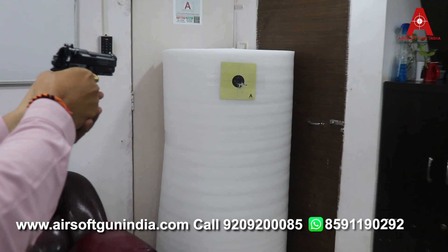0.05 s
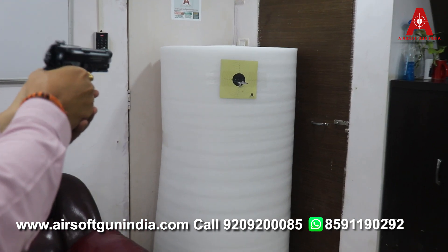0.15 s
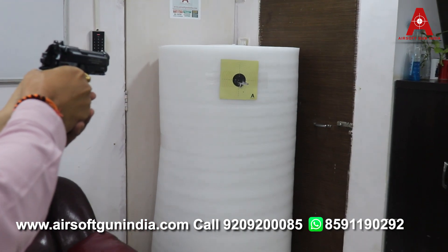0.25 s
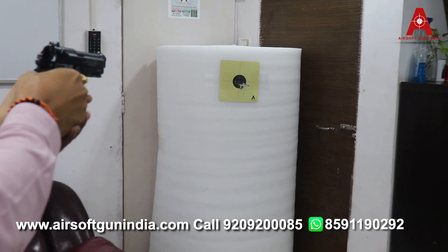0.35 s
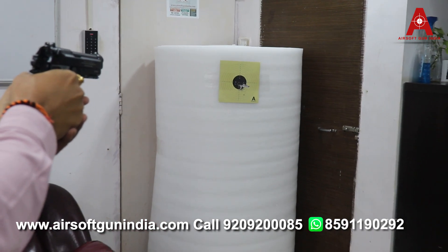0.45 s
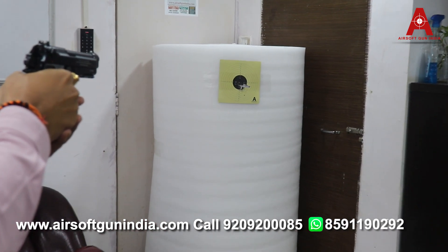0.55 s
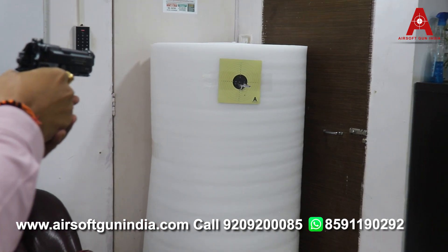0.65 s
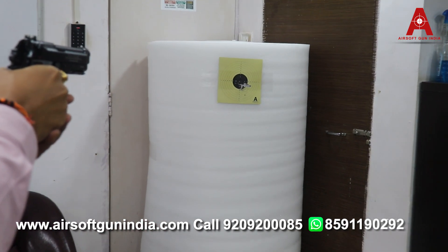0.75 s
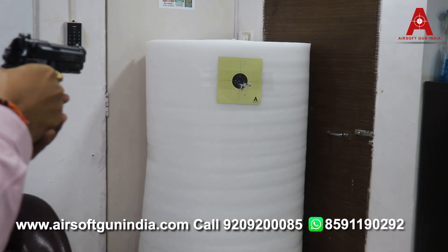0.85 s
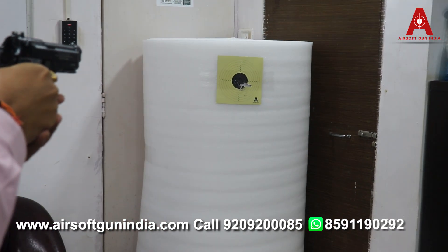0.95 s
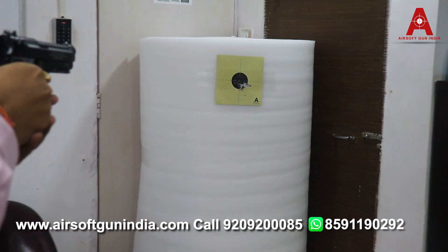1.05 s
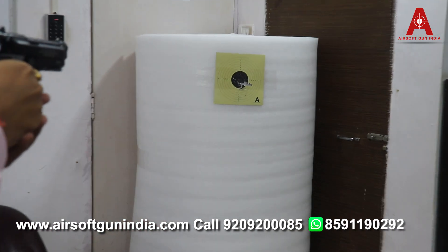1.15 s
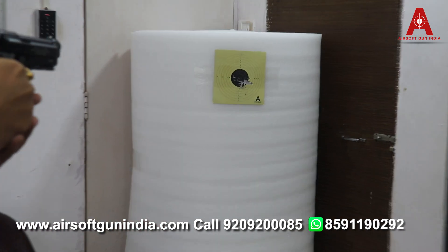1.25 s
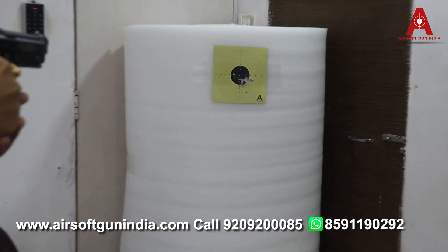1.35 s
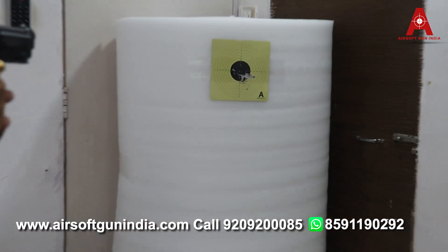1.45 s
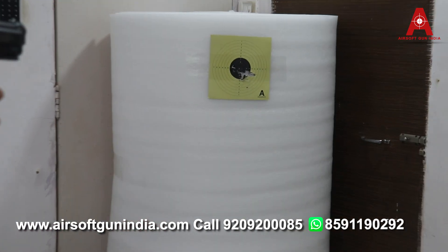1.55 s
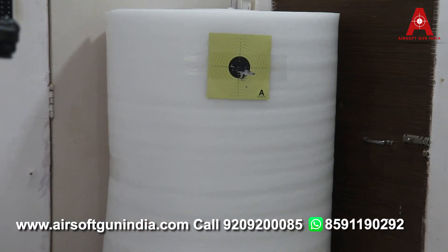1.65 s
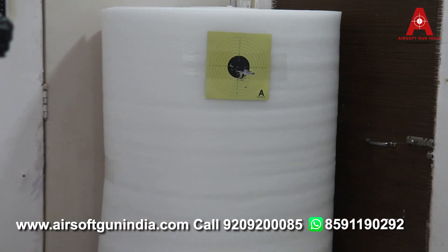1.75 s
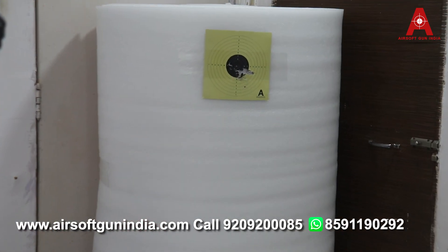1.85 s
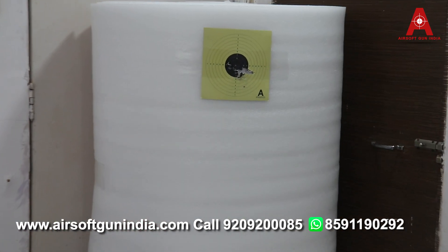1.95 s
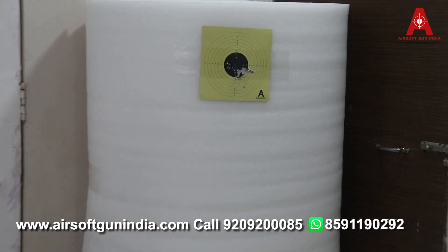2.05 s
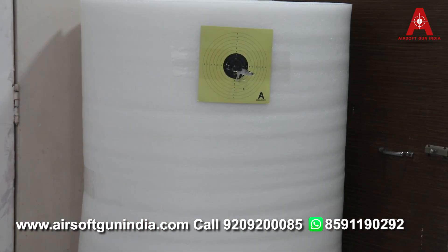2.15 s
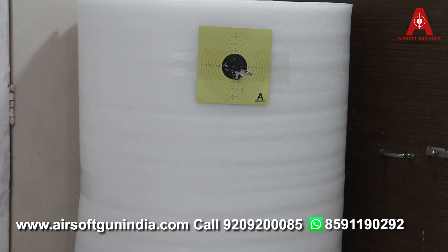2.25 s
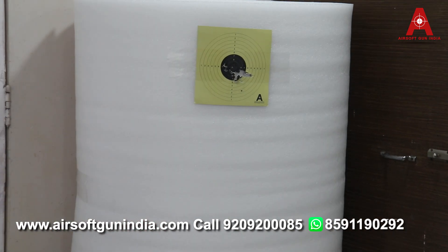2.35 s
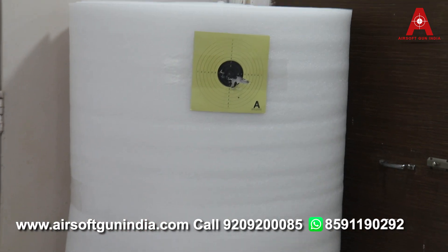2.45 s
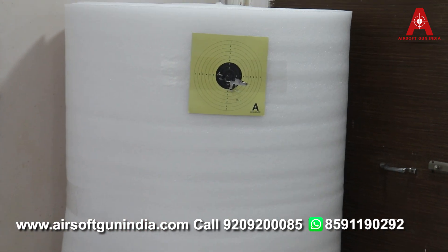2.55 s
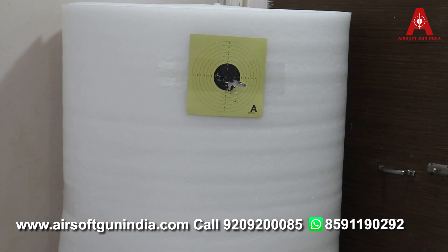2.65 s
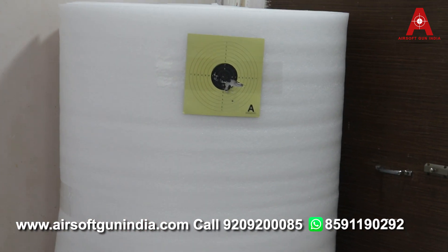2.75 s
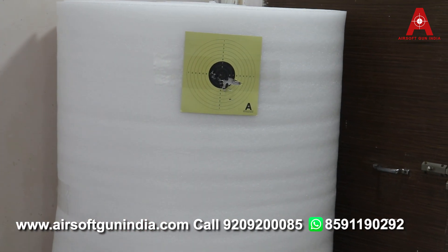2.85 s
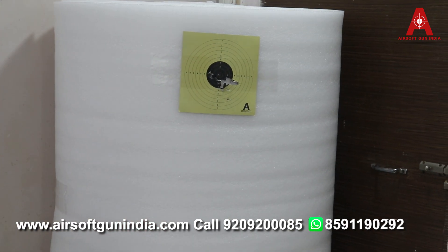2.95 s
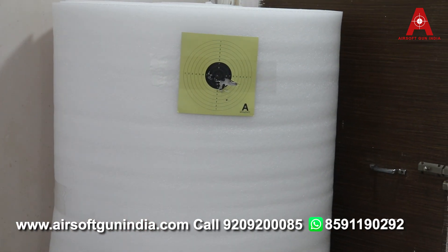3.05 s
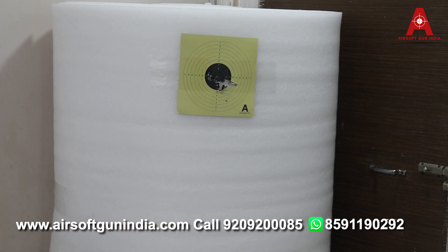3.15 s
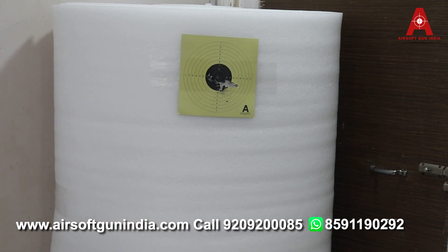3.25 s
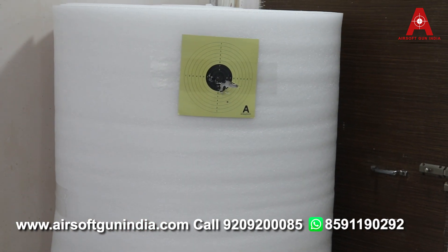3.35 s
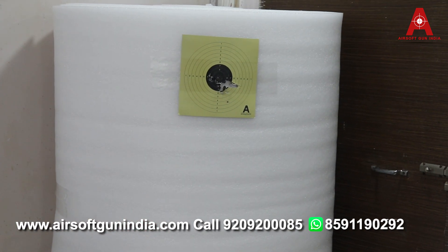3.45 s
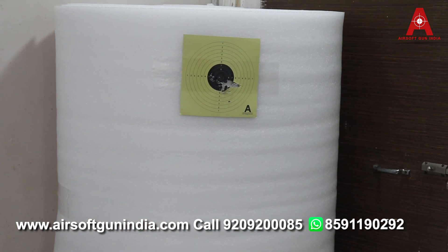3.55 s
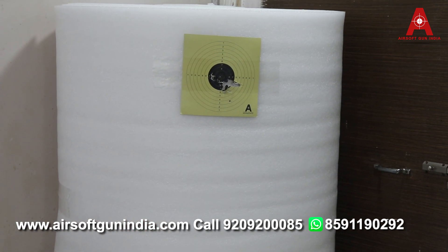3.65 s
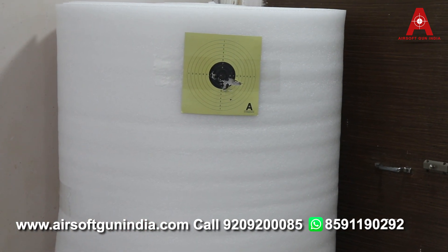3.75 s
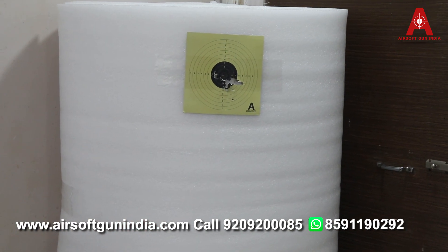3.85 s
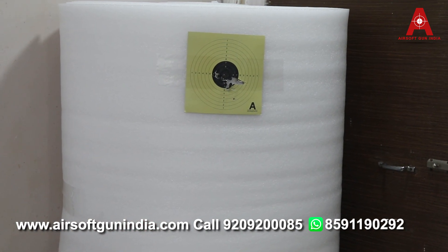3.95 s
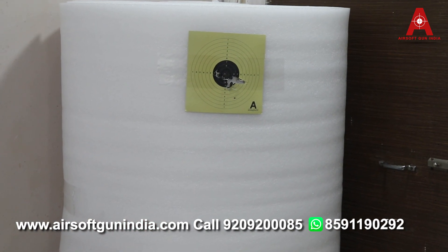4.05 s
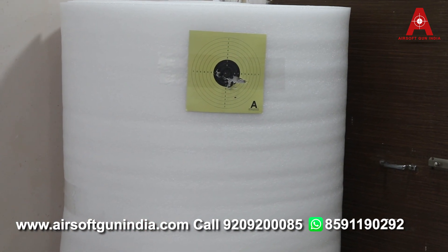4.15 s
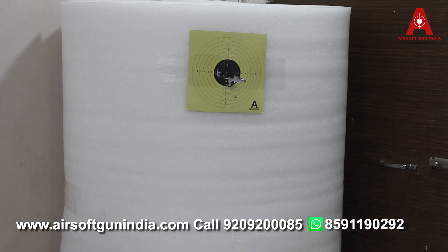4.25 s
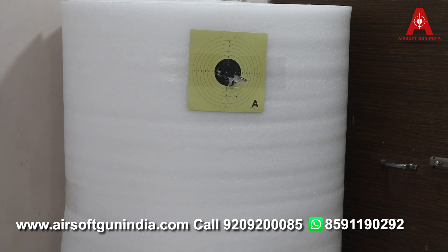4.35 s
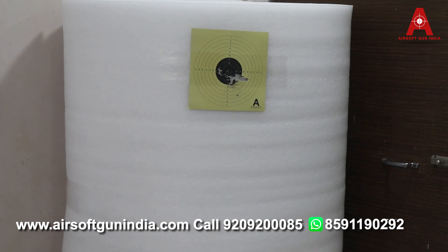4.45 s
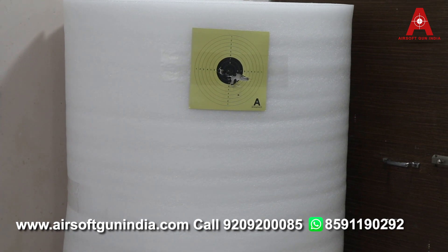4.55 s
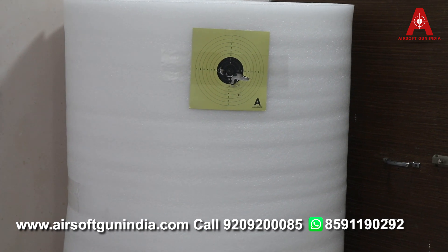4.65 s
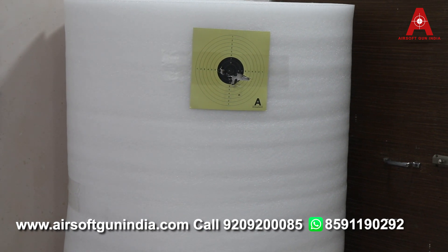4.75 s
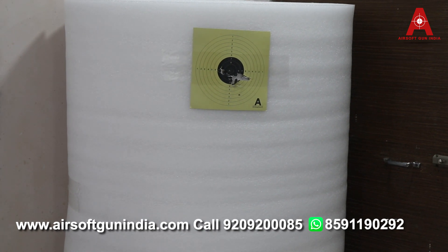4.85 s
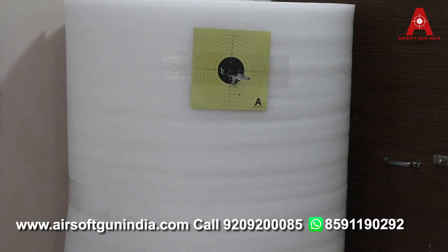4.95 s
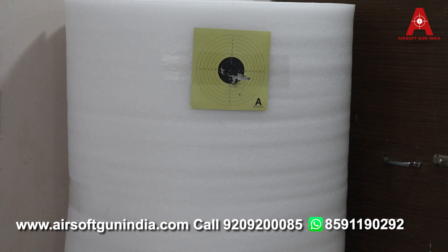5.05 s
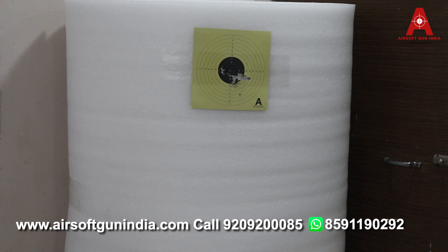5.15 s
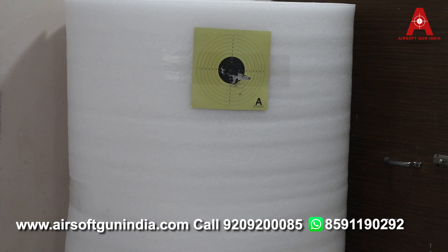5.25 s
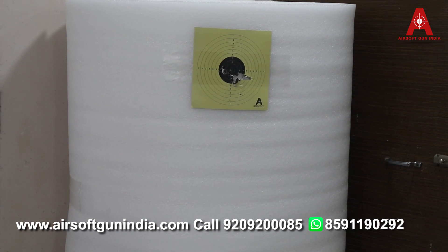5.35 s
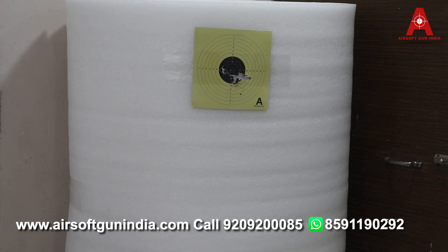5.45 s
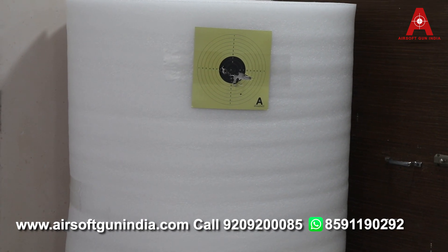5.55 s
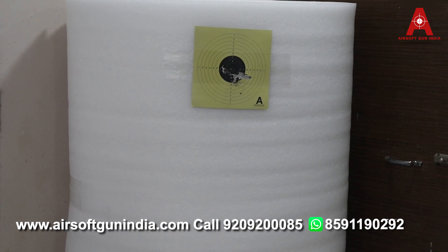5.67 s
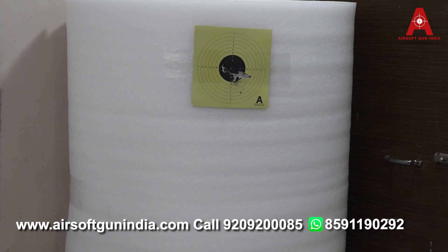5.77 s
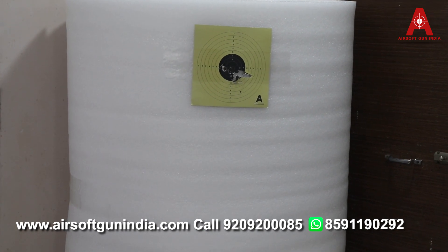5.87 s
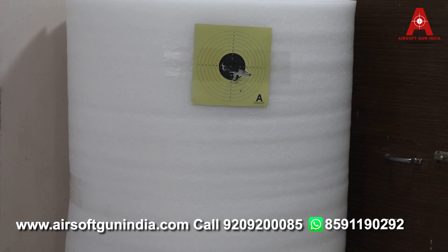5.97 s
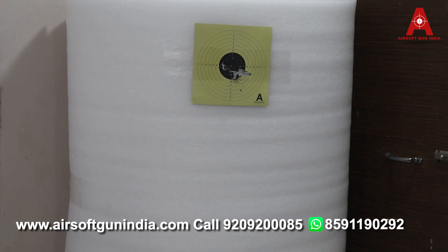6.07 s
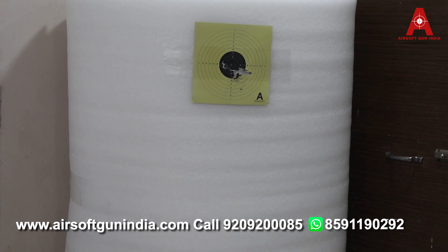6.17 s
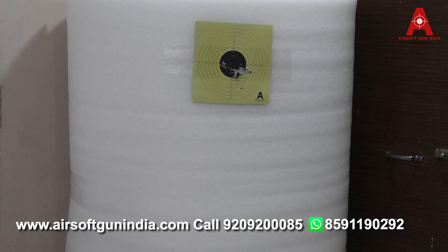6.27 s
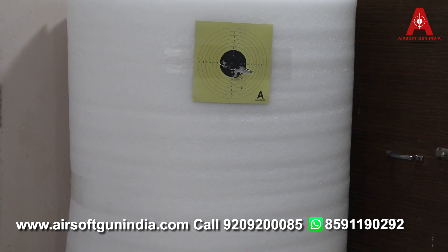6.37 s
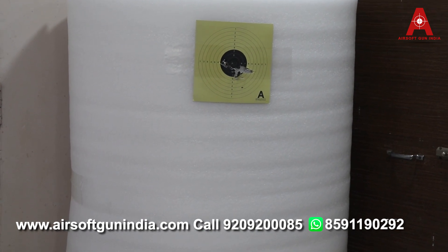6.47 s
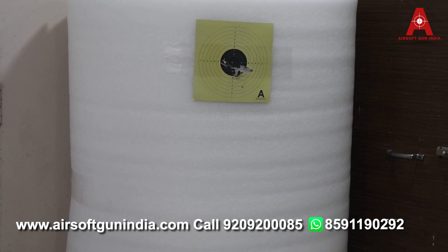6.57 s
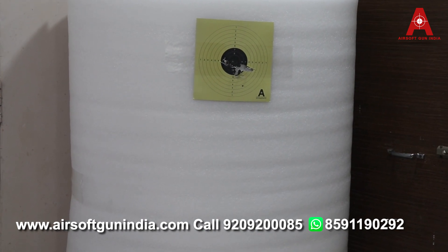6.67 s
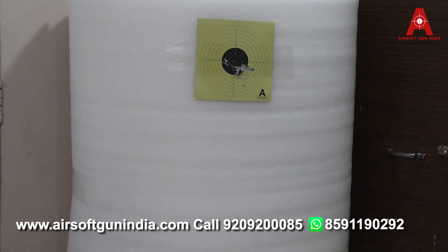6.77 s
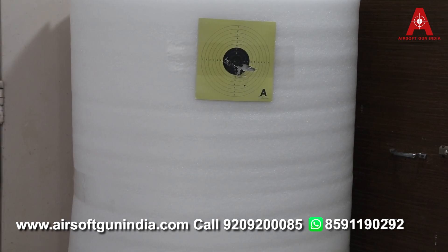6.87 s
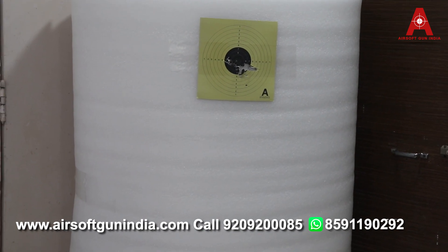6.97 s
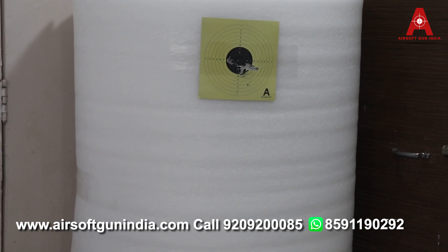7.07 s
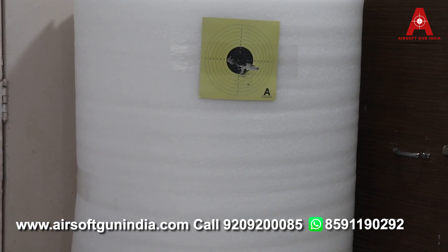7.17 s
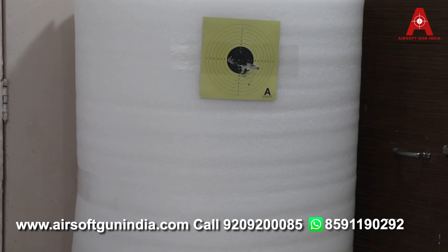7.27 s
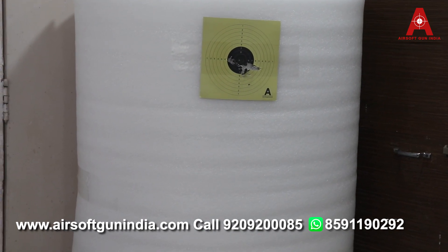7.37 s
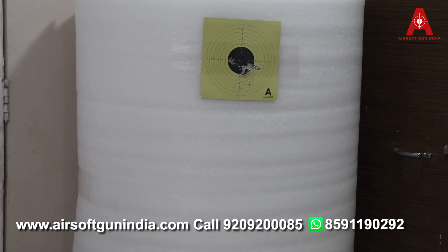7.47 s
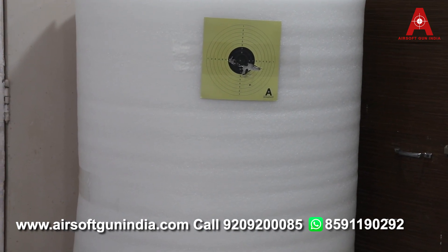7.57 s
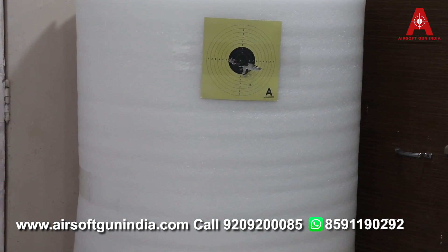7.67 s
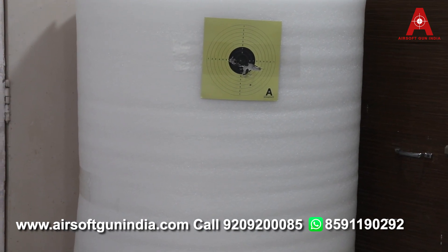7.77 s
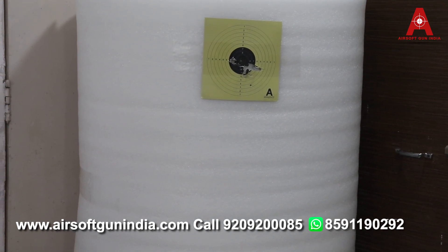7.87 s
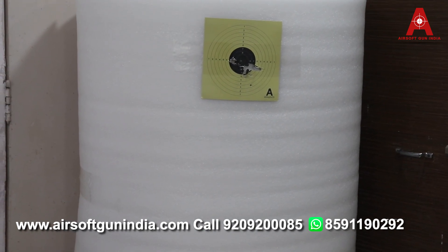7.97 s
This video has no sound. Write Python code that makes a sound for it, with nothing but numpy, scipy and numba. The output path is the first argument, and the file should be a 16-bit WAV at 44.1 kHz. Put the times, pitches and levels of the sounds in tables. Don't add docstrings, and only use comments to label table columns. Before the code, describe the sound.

A blowback gas pistol fires ten times in a small hard-walled room, fairly evenly under a second apart. Each shot is a harsh crack with gas burst, bright slide clatter and rapid wall echoes, followed by a dense reverberation held loud before it dies. A thin trigger tick follows each of the first nine shots. Faint street rumble and hiss lie beneath. The close mono microphone overloads and its level is squeezed.

```python
import sys
import numpy as np
from scipy import signal
from scipy.fft import rfft, irfft, next_fast_len
from scipy.io import wavfile
from scipy.ndimage import map_coordinates
from numba import njit

SR = 44100
rng = np.random.default_rng(int(sys.argv[2]) if len(sys.argv) > 2 else 0)


def inscribe(sig):
    pcm = np.round(np.clip(np.atleast_2d(sig).T, -1, 1) * 32767)
    wavfile.write(sys.argv[1], SR, pcm.astype(np.int16))


def rack_gain(trim_db):
    fader = np.asarray(trim_db, float)
    return 10 ** (fader / 20)


N = 353682
SHOT_SIZE = 6000

# pitch_hz, level_db_per_hz
RUMBLE_SPECTRUM = [(12, -27.5), (50, -3.5), (95, 2), (150, -12), (310, -8.5), (650, -18), (900, -17),
                   (3500, -55)]
# pitch_hz, level_db_per_hz
HISS_SPECTRUM = [(700, -22), (1500, -1.5), (4000, -4.5), (15500, -7.5)]
# time_s, level_db
STREET_ACTIVITY = [(0, -5), (.9, 1), (1.8, 0.5), (2.7, -1), (3.5, -2.5), (4.301, 1), (5.2, -1), (6.001, 3),
                   (6.901, -2.5), (7.7, 3), (8.02, -1.5)]
# start_s, peak_db
SHOTS = [
    (0.2227, -0.5),
    (1.1896, -1),
    (2.0082, -1),
    (2.8378, -1),
    (3.7268, -1),
    (4.5796, -1),
    (5.4296, -0.5),
    (6.2699, -1),
    (7.0991, -1),
    (7.8647, -2.5),
]
# pitch_hz, level_db, t60_s
HAMMER_MODES = [(4260, 3.5, 0.0066), (9050, 0, 0.0028), (13000, 0.5, .003), (1500, -12, 0.0048)]
# pitch_hz, level_db_per_hz
LEAK_SPECTRUM = [(500, -23.5), (1500, 0), (4000, -3.5), (8000, -1.5), (15000, -9.5)]
# delay_s, level_db, pitch_hz
ARRIVALS = [
    (0.0002, 1.5, 959),
    (.0017, -6, 900),
    (.0058, -6.5, 600),
    (.0076, 11, 465.6),
    (0.0116, 6, 515.6),
    (0.0162, -6, 480),
    (.031, 9, 554.4),
]
# pitch_hz, level_db, t60_s
SLIDE_MODES = [(4208, -8.5, 0.082), (5330, -14.5, 0.053), (6400, -10, 0.017), (6450, 2, 0.051),
               (6970, -3.5, 0.026), (8140, 1.5, .04), (7920, -5, 0.034)]
# pitch_hz, level_db_per_hz
JET_SPECTRUM = [(470, -30), (800, -2), (3090, -28.5), (3960, -5), (4600, -13.5), (6590, 7.5), (9560, -3),
                (15500, -10.5)]
# pitch_hz, level_db_per_hz
TAIL_SPECTRUM = [(60, -51.5), (125, -15), (450, -2.5), (2300, -7), (4050, -9.5), (6900, -8), (9000, -12),
                 (15700, -21)]
# pitch_hz, t60_s
TAIL_DECAY = [(100, 0.96), (260, 0.49), (700, 0.54), (1840, 0.57), (4500, 0.53), (6900, 0.51), (9700, 0.46),
              (14000, 0.41)]
# pitch_hz, width_hz, level_db
TAIL_PEAKS = [(481, 49, -2.5), (1010, 120, 0), (1680, 300, 0), (2153, 310, 0.5)]
# pitch_hz, level_db, t60_s, sign, delay_s
ROOM_MODES = [
    (138, -24, 0.65, 0.82, 0.0053),
    (229.4, -14, 0.5, 0.7, .008),
    (318.5, -34, .7, 1, .23),
    (323.5, -34, .7, -1, .23),
    (480, -2.5, 0.4, 0.96, 0.00788),
    (509, -0.5, 0.29, -0.83, .008),
]
# start_s, peak_db
RESETS = [
    (0.397, -9),
    (1.3551, -12),
    (2.188, -12),
    (3.01, -8.5),
    (3.8898, -13),
    (4.739, -10),
    (5.5971, -10),
    (6.443, -11),
    (7.2724, -13.5),
]
# start_s, peak_db, pitch_hz, t60_s
KNOCKS = [
    (0.853, -38, 600, 0.03),
    (1.066, -54, 1400, .04),
    (5.351, -38, 280, 0.88),
    (6.029, -33, 291, 0.72),
    (6.185, -53, 768, .1),
    (7.6, -55.5, 202, 0.47),
    (4.2, -58.5, 302, 1.5),
    (7.659, -54, 320, 0.97),
]


def rms_one(x):
    return x / np.sqrt(np.mean(x ** 2) + 1e-20)


def at_hz(points, hz):
    table_hz, value = np.transpose(points)
    return np.interp(np.log(hz), np.log(table_hz), value)


def ring(clicks, hz, t60_s):
    r, w = rack_gain(-60 / (t60_s * SR)), 2 * np.pi * hz / SR
    return signal.lfilter([0, np.sin(w)], [1, -2 * r * np.cos(w), r * r], clicks + 1e-18)


def drift(rate_hz):
    points = rng.standard_normal(400)
    coarse_s = np.arange(N // 100 + 2) * 100 / SR
    coarse = map_coordinates(points, [coarse_s * min(rate_hz, 40) + 2], order=3)
    return np.interp(np.arange(N) / 100, np.arange(len(coarse)), coarse)


def colored(spectrum, size, count=1):
    hz = np.maximum(np.fft.rfftfreq(size, 1 / SR), 1)
    white = rfft(rng.standard_normal((count, size)))
    return rms_one(irfft(white * rack_gain(at_hz(spectrum, hz)), size)).squeeze()


def bands(x, top_hz):
    size = x.shape[-1]
    octave = np.log2(np.maximum(np.fft.rfftfreq(size, 1 / SR), 1))
    whole = rfft(x)
    for centre in np.arange(4.25, np.log2(top_hz), 0.5):
        share = np.clip(1 - 2 * abs(octave - centre), 0, 1)
        yield 2 ** centre, irfft(whole * share, size)


def lay(out_len, start_s, sound):
    out, i = np.zeros(out_len), round(start_s * SR)
    out[i:i + len(sound)] = sound[:out_len - i]
    return out


def burst(rise_s, t60_s, size):
    t_s = np.arange(size) / SR
    return (1 - np.exp(-t_s / rise_s)) * rack_gain(-60 * t_s / t60_s)


def background():
    rumble_db, hiss_db = -54.5, -61.5
    together, size = drift(4.5), next_fast_len(N)
    rumble = 0
    for _, band in bands(colored(RUMBLE_SPECTRUM, size), 4000):
        rumble = rumble + band[:N] * rack_gain(1.5 * together + 2.0 * drift(12.0))
    street_db = np.interp(np.arange(N) / SR, *np.transpose(STREET_ACTIVITY))
    hiss = colored(HISS_SPECTRUM, size)[:N]
    return rack_gain(rumble_db + street_db) * rumble + rack_gain(hiss_db) * hiss


def hammer():
    tick = rack_gain(-32.5) * rng.standard_normal(SHOT_SIZE) * burst(0.00025, 0.0046, SHOT_SIZE)
    steel = sum(rack_gain(db) * ring(tick, hz, t60_s) for hz, db, t60_s in HAMMER_MODES)
    valve = rack_gain(-33) * colored(LEAK_SPECTRUM, SHOT_SIZE) * burst(0.0029, 0.2, SHOT_SIZE)
    return steel + valve


def gas_leak():
    peak_s, end_s, rise_s = 0.012, 0.0135, 0.0013
    t_s = np.arange(SHOT_SIZE) / SR
    swell = np.exp(np.minimum(t_s - peak_s, 0) / rise_s) * (t_s < end_s)
    return rack_gain(-8.5) * colored(LEAK_SPECTRUM, SHOT_SIZE) * swell


def gas_pulse(hz):
    cycles = np.arange(round(2 * SR / hz)) * hz / SR
    return -np.cos(2 * np.pi * (cycles - 1)) * np.exp(-((cycles - 1) / 0.53) ** 2)


def muzzle():
    push_s, push_length_s, push_db = 0.0105, 0.022, 0.5
    muzzle_s = 0.0125
    out = rack_gain(push_db) * lay(SHOT_SIZE, push_s, np.hanning(round(push_length_s * SR)))
    for delay_s, db, hz in ARRIVALS:
        pulse = rack_gain(db + rng.normal(0, 1.0)) * gas_pulse(hz)
        out += lay(SHOT_SIZE, muzzle_s + delay_s - 1 / hz, pulse)
    return out


def slide():
    clack_s, home_s = 0.0139, 0.049
    rattle = rng.standard_normal(SHOT_SIZE) * burst(0.00041, 0.014, SHOT_SIZE)
    metal = sum(rack_gain(db - 9.5) * ring(rattle, hz, t60_s) for hz, db, t60_s in SLIDE_MODES)
    jet = rack_gain(4.0) * colored(JET_SPECTRUM, SHOT_SIZE) * burst(0.000077, 0.093, SHOT_SIZE)
    home = rack_gain(-2) * colored(LEAK_SPECTRUM, SHOT_SIZE) * burst(0.001, 0.035, SHOT_SIZE)
    return lay(SHOT_SIZE, clack_s, metal + jet) + lay(SHOT_SIZE, home_s, home)


def pistol(start_s, level_db):
    hammer_lead_s = 0.0102
    return lay(N, start_s - hammer_lead_s, hammer() + rack_gain(level_db) * (gas_leak() + muzzle() + slide()))


def tail_tint(size):
    pipe_hz, pipe_width_hz, pipe_top_hz = 496.5, 150, 6700
    pipe_db, loss_db_per_khz = 6.5, 5
    pipe = [(hz, pipe_width_hz, pipe_db - loss_db_per_khz * abs(hz - pipe_top_hz) / 1000)
            for hz in pipe_hz * np.arange(9, 17)]
    z = np.exp(-2j * np.pi * np.fft.rfftfreq(size))
    tint = 1
    for hz, width_hz, db in list(TAIL_PEAKS) + pipe:
        r = np.exp(-np.pi * width_hz / SR)
        poles = 1 - 2 * r * np.cos(2 * np.pi * hz / SR) * z + (r * z) ** 2
        tint = tint + rack_gain(db) * (1 - r * r) / 2 * (1 - z * z) / poles
    return tint


def room():
    size, tail_db = 36000, -12.5
    t_s = np.arange(size) / SR
    plain = colored(TAIL_SPECTRUM, size, count=len(SHOTS) + 1)
    tinted = rms_one(irfft(rfft(plain) * tail_tint(size), size))
    tails = 0
    for hz, band in bands(tinted, 24000):
        fresh = hz / (hz + 2500)
        mixed = np.sqrt(1 - fresh) * band[0] + np.sqrt(fresh) * band[1:]
        tails = tails + mixed * rack_gain(-60 * (t_s - 0.18) / at_hz(TAIL_DECAY, hz))
    tails *= 1 - np.exp(-t_s / 0.0083)
    out = np.zeros(N)
    for (start_s, level_db), tail in zip(SHOTS, tails):
        out += lay(N, start_s + 0.003, rack_gain(level_db) * tail)
    return rack_gain(tail_db) * out


def standing_waves():
    out = np.zeros(N + SR)
    for hz, db, t60_s, sign, delay_s in ROOM_MODES:
        clicks = np.zeros(N + SR)
        for start_s, level_db in SHOTS:
            clicks[round((start_s + delay_s) * SR)] = sign * rack_gain(level_db + db + rng.normal(0, 1.0))
        out += ring(clicks, hz, t60_s)
    return out[:N]


def trigger():
    out, size = np.zeros(N), 900
    high = signal.butter(2, 9500, "high", fs=SR, output="sos")
    shape = burst(0.0002, 0.01, size) + rack_gain(-14) * burst(0.001, 0.05, size)
    for start_s, level_db in RESETS:
        tick = signal.sosfilt(high, rng.standard_normal(size) * shape)
        out += lay(N, start_s - 0.001, rack_gain(level_db + 12.0) * tick)
    return out


def knocks():
    out, size, rise_cycles = np.zeros(N), 20000, 1.9
    for start_s, level_db, hz, t60_s in KNOCKS:
        octave = [(hz / 4, -24), (hz / 1.6, -3), (hz, 0), (hz * 1.7, -4), (hz * 2.5, -23), (hz * 8, -45)]
        thud = colored(octave, size) * burst(rise_cycles / hz, t60_s, size)
        out += lay(N, start_s, rack_gain(level_db) * thud)
    return out


def hum():
    start_s, length_s, pitch_hz, level_db = 3.4, 0.32, 213, -55
    t_s = np.arange(round(length_s * SR)) / SR
    tone = np.sqrt(np.hanning(len(t_s))) * np.sin(2 * np.pi * pitch_hz * t_s)
    return lay(N, start_s, rack_gain(level_db) * tone)


def scene():
    direct = sum(pistol(start_s, level_db) for start_s, level_db in SHOTS)
    mono = background() + direct + room() + standing_waves() + trigger() + knocks() + hum()
    return np.tile(mono, (2, 1))


def preamplifier(x):
    up, down = 1.3, 20.0
    hot = np.where(x > 0, up * np.tanh(x / up), down * np.tanh(x / down))
    hot = signal.sosfilt(signal.butter(1, 30, "high", fs=SR, output="sos"), hot)
    return signal.sosfilt(signal.cheby2(12, 60, 16900, fs=SR, output="sos"), hot)


@njit
def follow(wanted_db, grab, let_go):
    out, now = np.empty_like(wanted_db), 0.
    for i in range(len(out)):
        now += (grab if wanted_db[i] < now else let_go) * (wanted_db[i] - now)
        out[i] = now
    return out


def leveller_gain(x):
    hold_db, sense_s, react_s = -22, 0.003, 0.0065
    grab_s, settle_s, let_go_s, settle_share = 0.0047, 0.055, 0.003, 0.33
    r = np.exp(-1 / (sense_s * SR))
    power = signal.lfilter([(1 - r) ** 2], [1, -2 * r, r * r], x ** 2)
    wanted_db = np.minimum(hold_db - 10 * np.log10(power + 1e-12), 0)
    wanted_db = np.interp(np.arange(N) - react_s * SR, np.arange(N), wanted_db)
    quick_db = follow(wanted_db, 1 / (grab_s * SR), 1 / (let_go_s * SR))
    slow_db = follow(wanted_db, 1 / (settle_s * SR), 1 / (let_go_s * SR))
    return rack_gain((1 - settle_share) * quick_db + settle_share * slow_db)


def line_hiss():
    spectrum = [(30, 17.5), (300, 8.5), (2000, 4), (15000, 4.5)]   # pitch_hz, level_db_per_hz
    return rack_gain(-67.5) * colored(spectrum, next_fast_len(N))[:N] * [[1], [-1]]


def band_limit(x):
    return signal.sosfilt(signal.butter(12, 15800, fs=SR, output="sos"), x)


def record(dry):
    hot = preamplifier(dry)
    levelled = (hot + line_hiss()) * leveller_gain(hot[0])
    mix = np.clip(levelled, -0.98, 0.98)
    return band_limit(mix)


dry = scene()
out = record(dry)
inscribe(out)
```